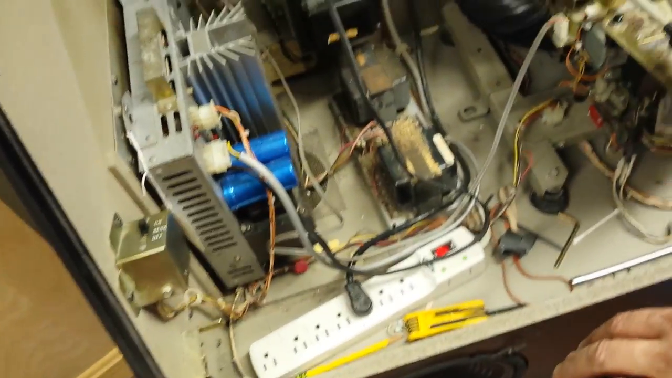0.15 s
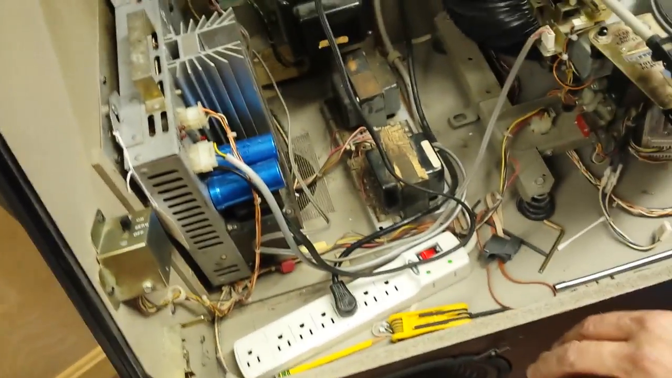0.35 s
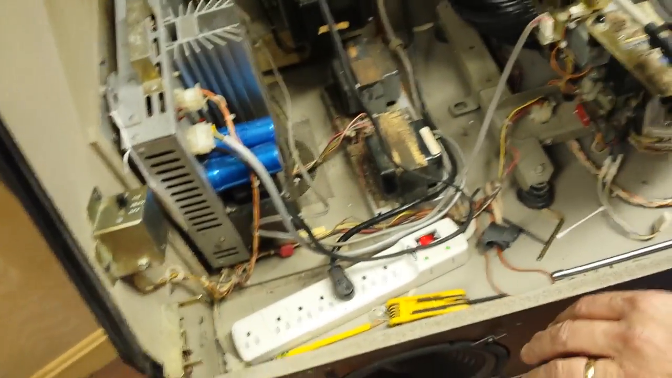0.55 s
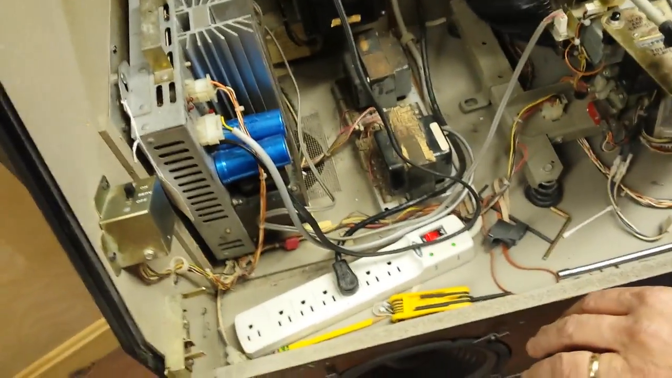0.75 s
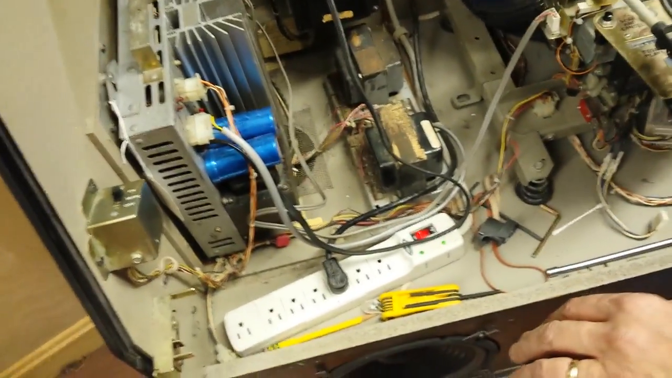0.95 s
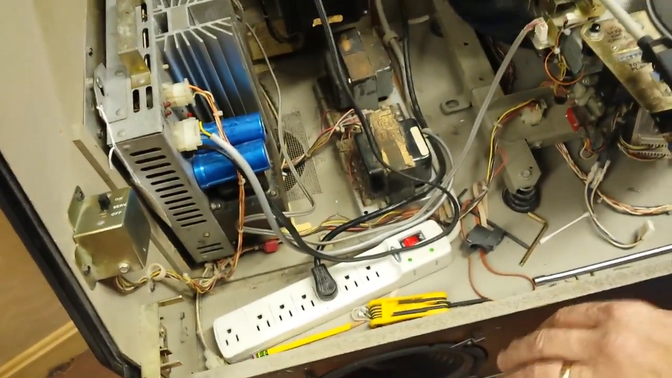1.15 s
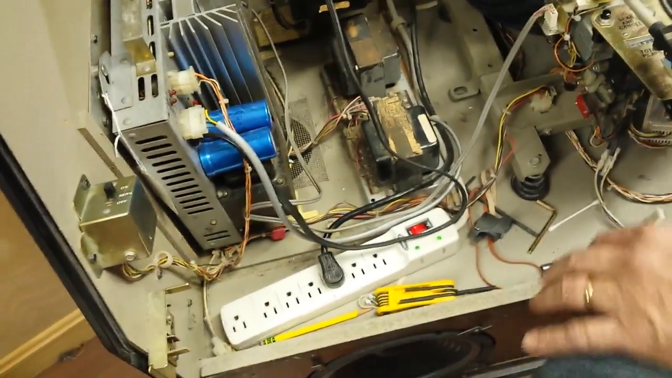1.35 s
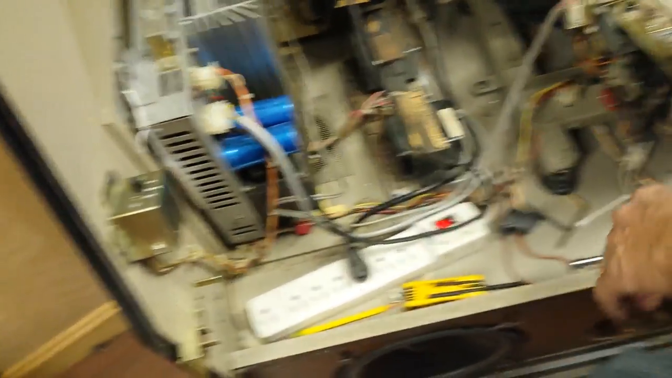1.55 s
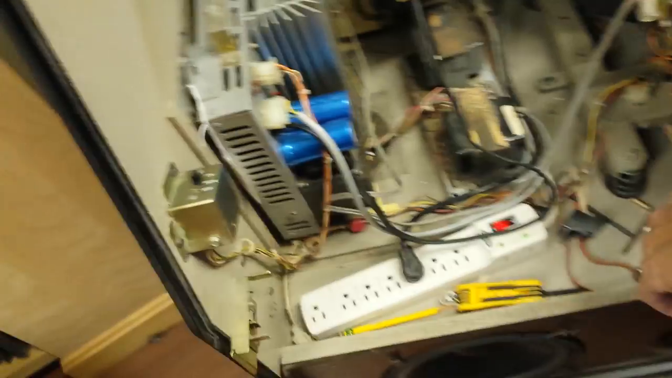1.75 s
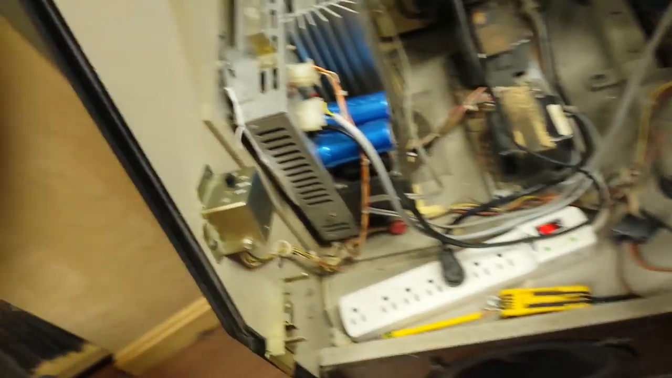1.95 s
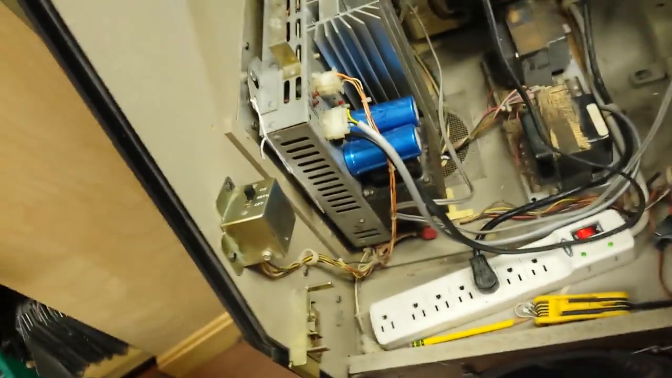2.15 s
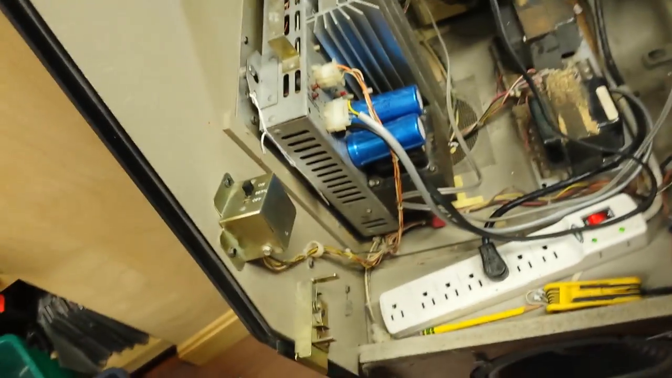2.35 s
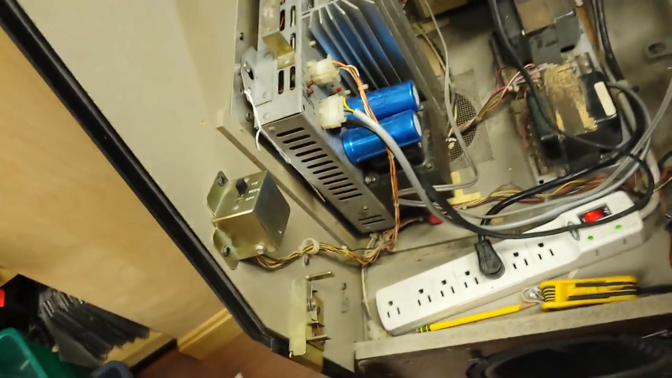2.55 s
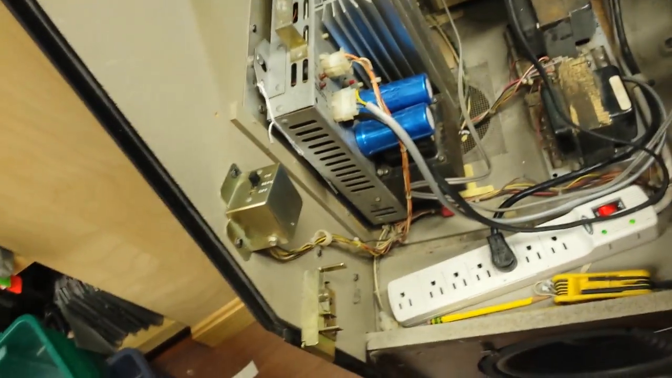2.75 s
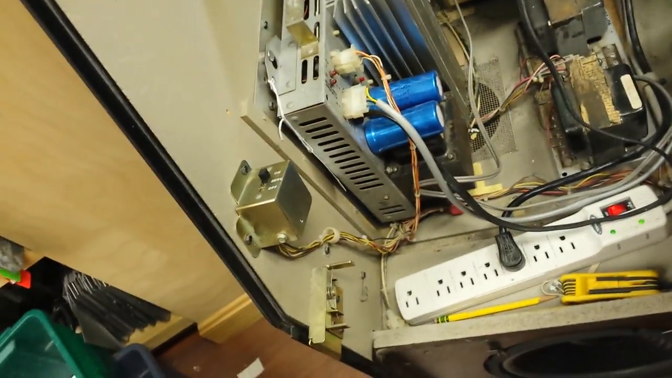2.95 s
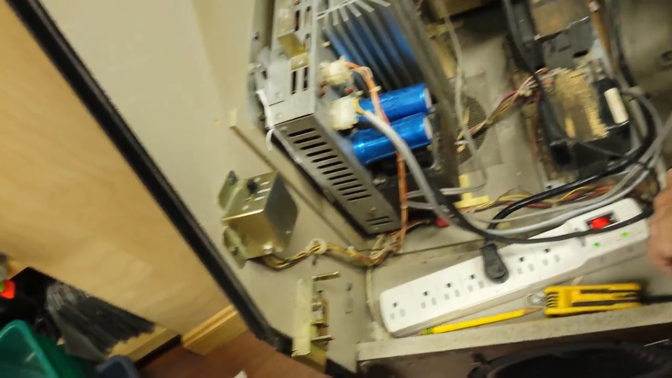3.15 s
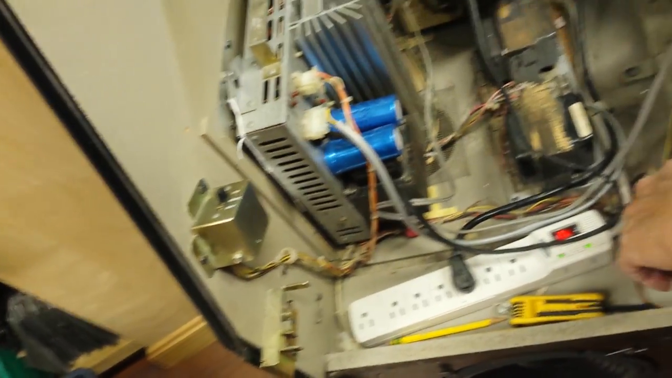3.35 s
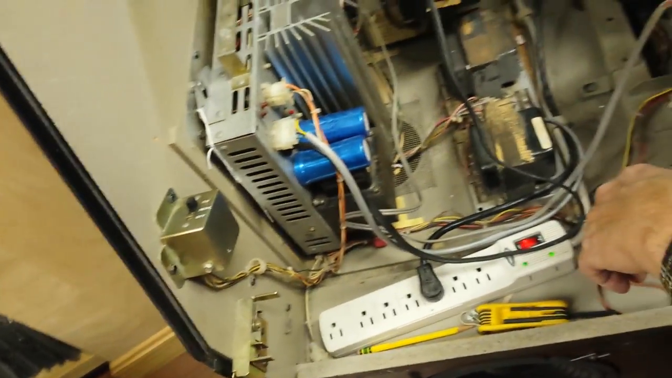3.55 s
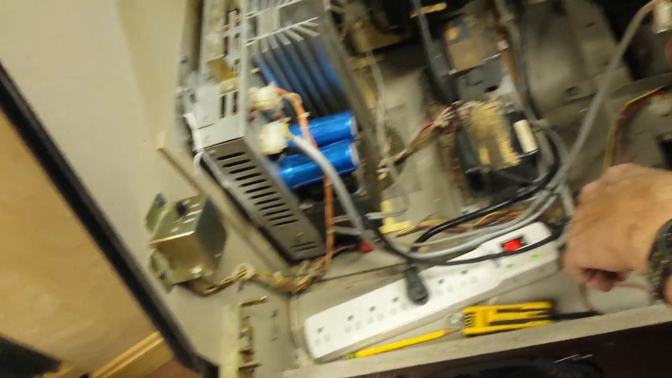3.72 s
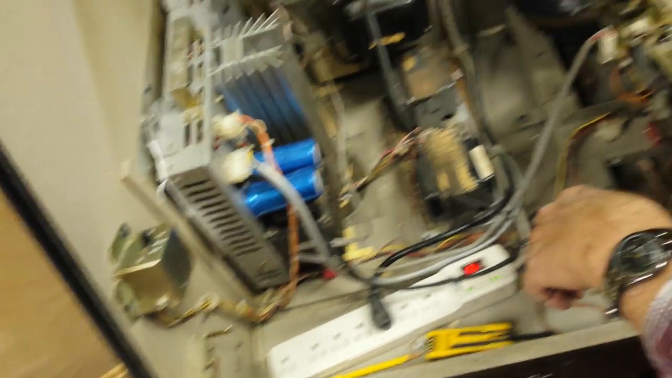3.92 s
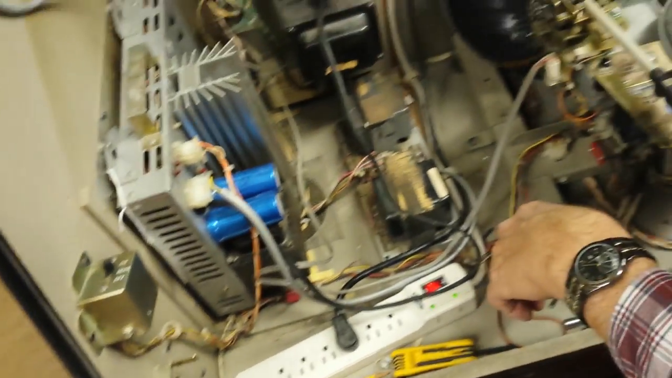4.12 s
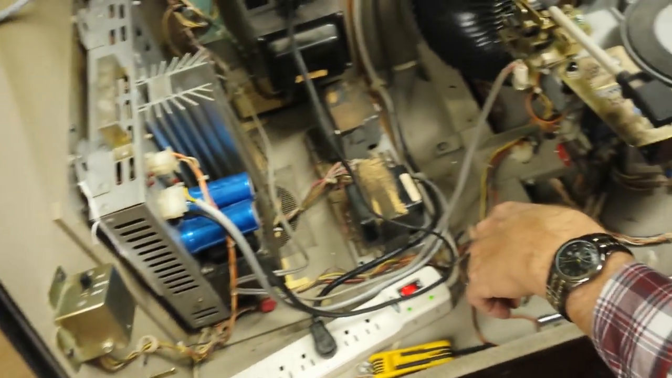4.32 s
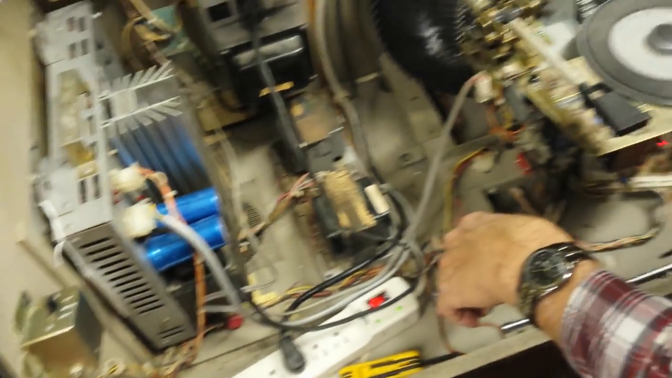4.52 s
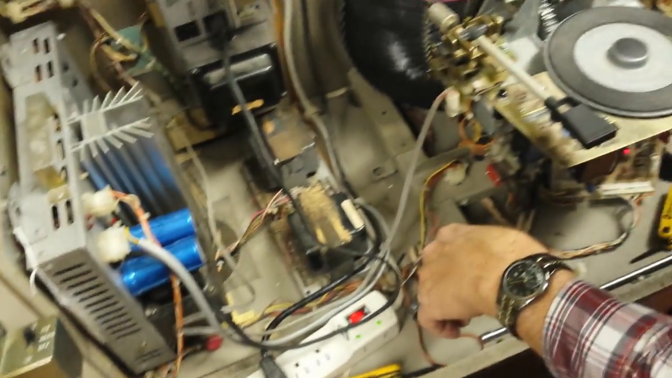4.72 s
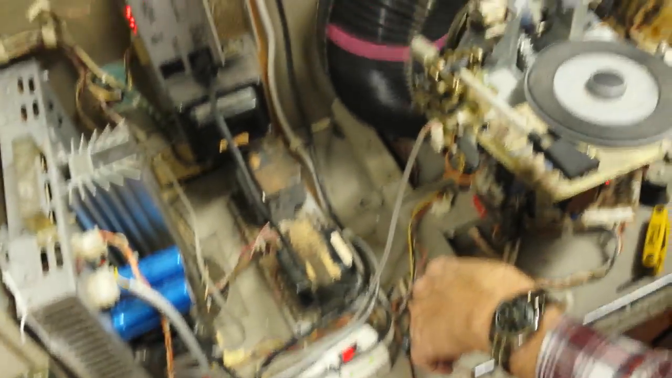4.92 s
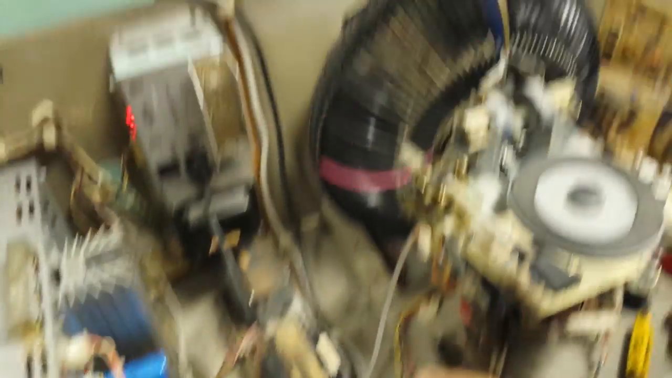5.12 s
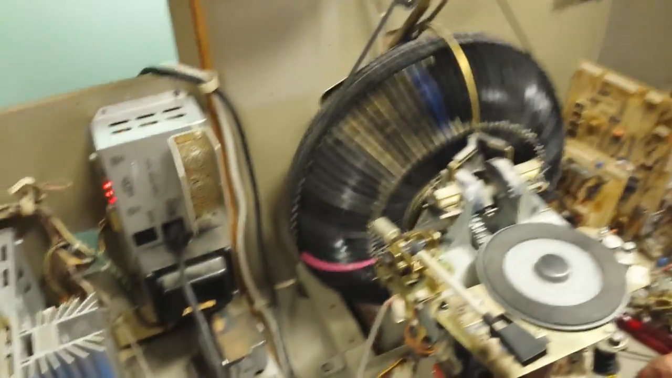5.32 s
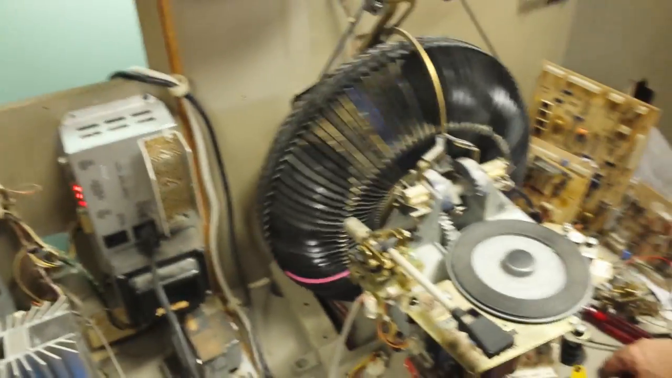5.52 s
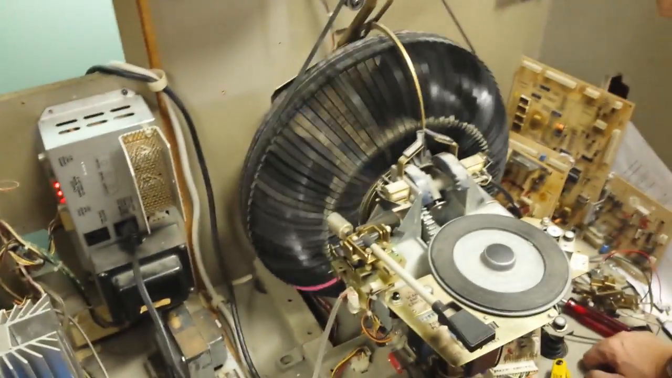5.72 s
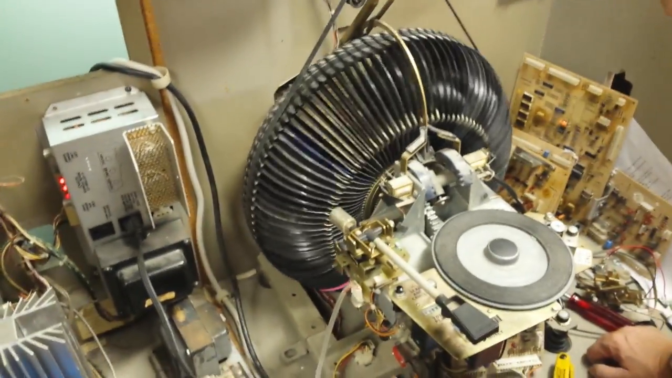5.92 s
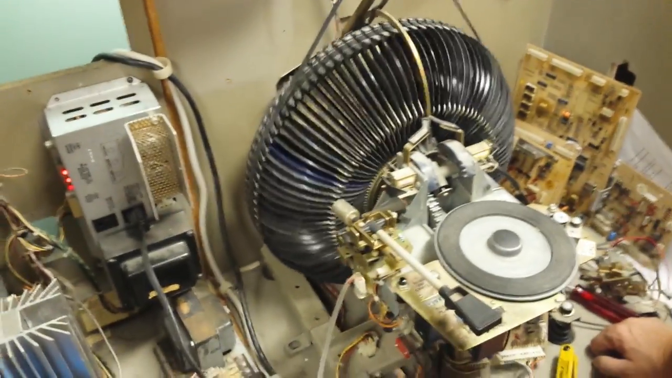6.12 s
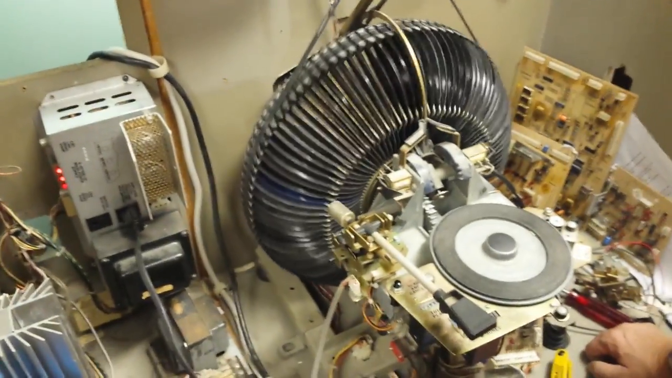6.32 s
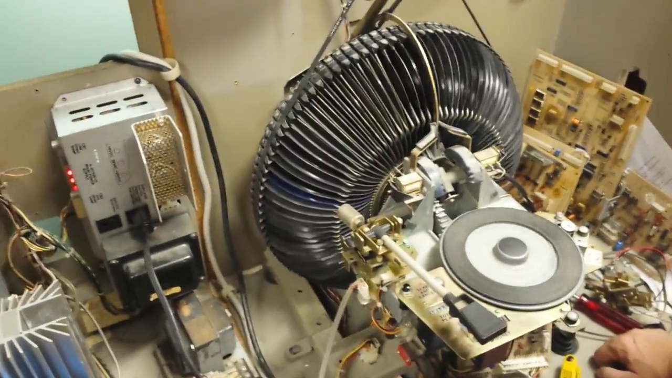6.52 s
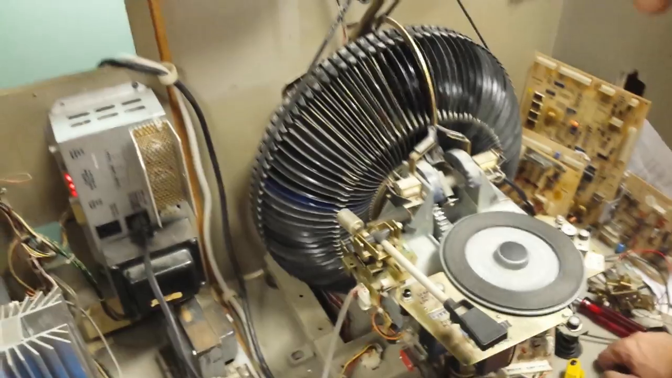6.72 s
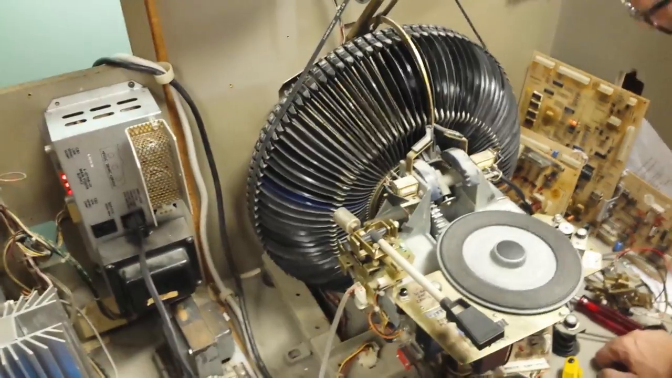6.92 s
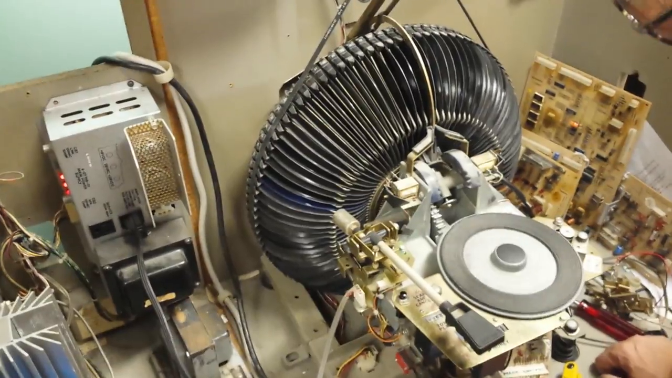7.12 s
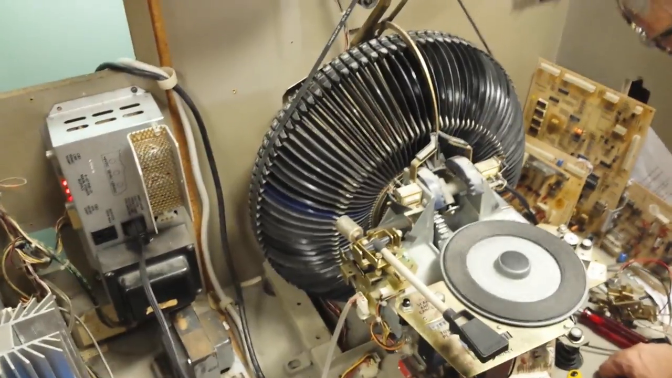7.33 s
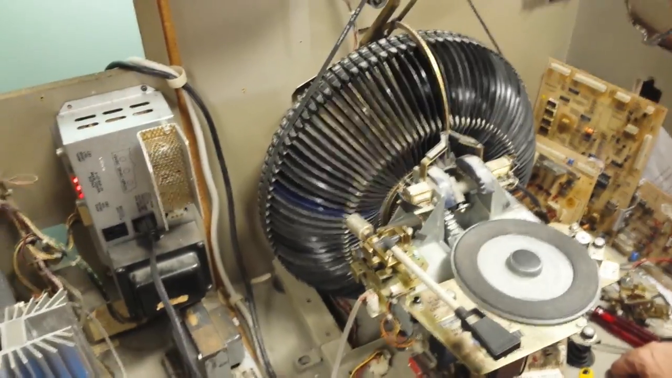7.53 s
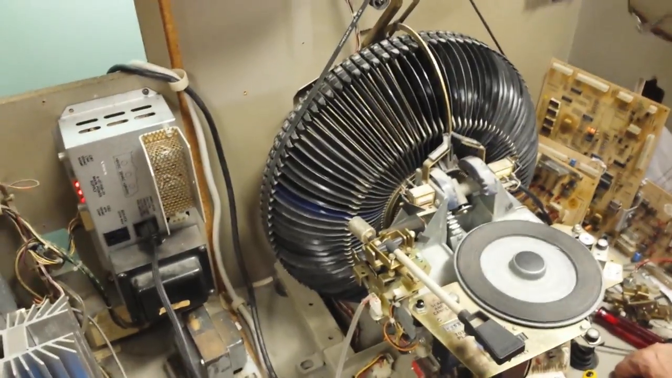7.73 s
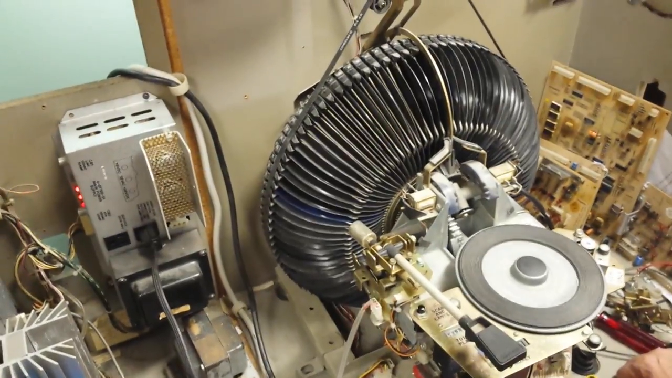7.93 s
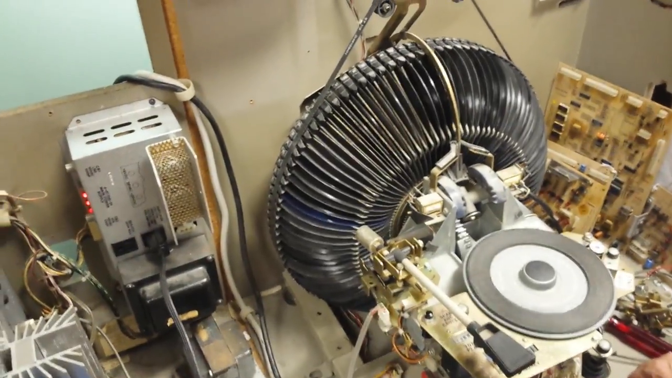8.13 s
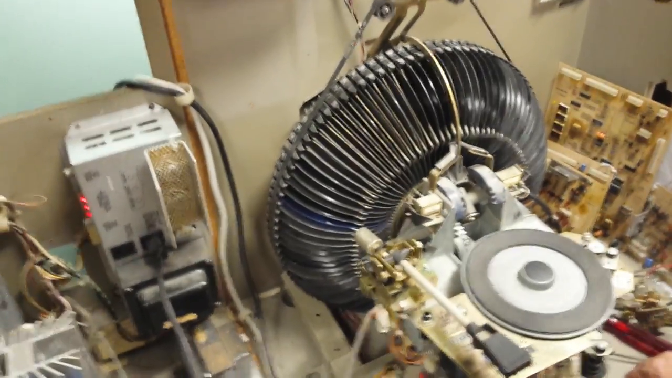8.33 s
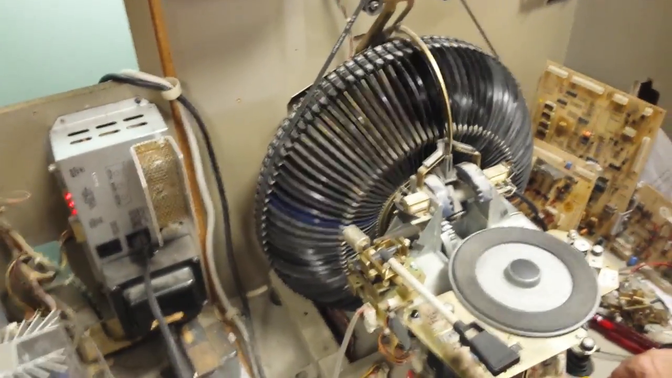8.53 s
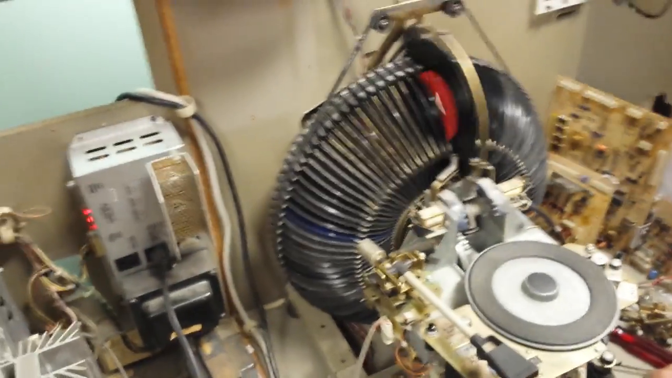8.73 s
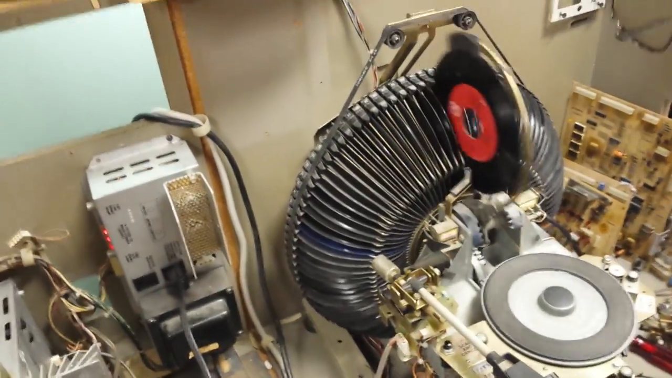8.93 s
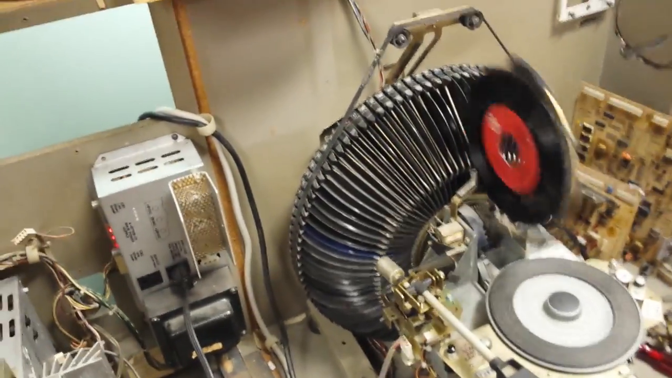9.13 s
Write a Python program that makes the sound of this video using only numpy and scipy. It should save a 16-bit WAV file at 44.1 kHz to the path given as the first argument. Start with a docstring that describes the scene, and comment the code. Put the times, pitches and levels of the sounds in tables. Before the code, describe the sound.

Close up in a quiet room, an open record-changing machine clicks on, whirs and rattles steadily, halts with sharp clacks, then a softer gear train lifts a record.

```python
"""A click, a whirring rattle that runs for six seconds and clatters to a halt: an open jukebox, heard close by.
A relay clicks, a latch pulls in and a geared motor turns the record magazine: random tooth contacts ring its
steel and frame. The latch drops and the records jostle; a quieter gear train then swings the arm that grips
a record and lifts it out, with clicks, taps and scrapes made of short bursts and damped modes.
Dull bumps ring the cabinet panels, a transformer hums underneath, and filtered noise makes the quiet room."""
import sys
import numpy as np
from scipy import signal
from scipy.fft import rfft, irfft, next_fast_len
from scipy.io import wavfile

SR = 44100
rng = np.random.default_rng(int(sys.argv[2]) if len(sys.argv) > 2 else 0)


def store_pcm(level_fs):
    """Save levels as 16-bit WAV."""
    pcm = np.round(np.clip(level_fs, -1, 1) * 32767).astype(np.int16)
    wavfile.write(sys.argv[1], SR, np.atleast_2d(pcm).T)


N = 408807
TIME = np.arange(N) / SR
HZ = np.maximum(np.fft.rfftfreq(8192, 1 / SR), 1)   # filter grid, kept above 0 for the logarithm

# In all tables below, a fall is the time to drop 60 dB, and a half-width is taken where the gain has halved.

# Magazine gears and the frame under them. Each row: frequency in Hz, relative density in dB per Hz.
GEAR_SPECTRUM = [(800, -19.5), (1000, -14), (1350, -9.5), (1800, -8.5), (2200, -2), (2550, -13.5),
                 (3100, -12.5), (3750, -6.5), (4150, 1), (5200, -5.5), (6700, -4), (7700, -0.5),
                 (8800, -12), (10200, -20), (15000, -27)]
FRAME_SPECTRUM = [(40, -28), (85, -18), (130, 6), (185, -7), (220, 2), (400, -3.5), (500, 3.5), (700, -7.5),
                  (970, -2), (1300, -21), (2200, -20.5)]
# Their resonances and notches. Each row: frequency in Hz, width in Hz, rise in dB.
GEAR_MODES = [(700, 200, 3), (960, 40, 7), (1298, 25, 5), (1348, 22, 9), (1463, 20, 8), (1514, 24, 5),
              (2490, 70, -4), (3610, 70, 5), (4060, 100, 1.5), (5730, 50, 4), (5980, 70, 5), (6250, 90, 4)]
FRAME_MODES = [(283.2, 29, 14.3), (408, 49, 10), (485, 17, 5.1), (885, 18, 5.2), (994, 57, 7.1)]
# Loose parts that ring along with the gears. Each row: frequency in Hz, half-width in Hz,
# level in dB against the clatter, dB more per unit of aim, flutter depth in dB.
LOOSE_RINGS = [(1514, 20, -25.5, -3, 1), (2308, 38, -19, 7.5, 2), (2240, 90, -21, 5, 1),
               (4380, 100, -15.5, 1.5, 3), (5990, 90, -18.5, 6, 3), (6270, 120, -18, 5.5, 3),
               (7175, 65, -7.5, -4, 2.5), (7520, 170, -18, 4, 4)]
RING_WANDER_DB, RING_BEND, RING_BEND_PER_S = 0.8, 0.005, 1.5   # level drift, pitch drift as a share, its rate
RING_BUILD_S = 0.25   # time constant for loose parts to shake free
MOTOR_HZ = 56.3   # mean turns per second
# The motor spins up (time constant), runs evenly, and coasts down once the latch has dropped.
START_S, SPIN_UP_S, STOP_S, COAST_DB_PER_S = 0.31, 0.041, 6.48, 68
CLATTER_DB, FRAME_DB = -27.5, -48.5   # at aim 0, before the cabinet
BURRS_PER_S, BURR_DB, BURR_SPREAD_DB = 70, -8.5, 2.5   # level against the ordinary tooth contacts
# The magazine sways on its bearing and loads the gears unevenly. Each row: swings per second, depth in dB.
SWAY = [(7.3, 0.3), (11.0, 0.7), (17.5, 0.5)]
SWAY_WIDTH_HZ = 0.7   # how far the swing rate strays
# Bands of the whirring rattle swell and fade as the magazine turns.
# Each row: height of the swell in seconds, swell time in seconds, level in dB, frequency in Hz, half-width in Hz.
BAND_SWELLS = [(0.326, 0.015, -35.5, 7500, 299), (0.327, 0.011, -42.5, 2280, 120),
               (1.2, 0.46, -36.5, 5070, 350), (1.88, 0.057, -37, 6070, 170), (2.15, 0.67, -33.5, 6190, 260),
               (2.3, .25, -33.5, 7400, 350), (4.75, 0.5, -37.5, 7130, 200), (4.999, 0.52, -38, 4400, 220),
               (5.8, 0.74, -41, 8100, 399)]
SWELL_UNEVEN_DB = 2.5
# Where the microphone points. Each row: time in seconds, aim from -1 at the magazine to +1 at the far side wall.
AIM = [(0.3, 0.17), (1.5, 0.12), (2.0, 0.75), (3.0, 0.7), (3.7, 0.67), (4.3, 0.26), (5.4, -0.7),
       (6.4, -0.3)]
AIM_LOSS_DB, AIM_FRAME_DB = 0.8, 1.3   # per unit of aim: the clatter weakens, the frame grows
# Left minus right: per unit of aim, of the magazine at aim 0, and of the transfer gears.
AIM_PAN_DB, MAGAZINE_PAN_DB, TRANSFER_PAN_DB = 1, 0.73, 1.3
# Cabinet walls. Each row: delay in seconds, seconds more per unit of aim, level in dB.
WALLS = [(0.0031, 0.0005, -13), (0.0052, -0.0008, -13), (0.0083, 0.0012, -14)]

# Transfer gears, their grinding under load, and the arm's gear that whirs while it carries the record.
# Each row: frequency in Hz, relative density in dB per Hz.
CAM_SPECTRUM = [(2500, -20), (3700, -2), (4400, 2.5), (5050, 6.5), (5850, -2), (6800, 0.5), (7650, 9.5),
                (8300, -0.5), (9300, -8.5), (12000, -21.5), (13200, -18), (15000, -38)]
GRIND_SPECTRUM = [(150, -17), (290, -4), (390, -6.5), (560, -15), (800, -11.5), (1000, 0.5), (1200, -11),
                  (1450, -10), (1680, 3.5), (1850, -5.5), (2100, 3.5), (2800, 0.5), (3700, 4),
                  (6000, -21.5)]
ARM_SPECTRUM = [(150, -8), (390, -6.5), (600, -7), (1100, -8.5), (2000, -12), (3100, -6.5), (4200, 6),
                (5200, 0.5), (6400, -3.5), (7400, 3.5), (8500, -13), (10300, -20), (15000, -30)]
# Resonances of the transfer gears and of the arm. Each row: frequency in Hz, width in Hz, rise in dB.
CAM_MODES = [(4390, 140, 6.5), (5380, 200, 5.5), (6480, 290, 5)]
ARM_MODES = [(406, 36, 11), (1150, 38, 11), (1620, 60, 7), (6710, 230, 13), (7240, 140, 11)]
# Transfer parts that sing under load. Each row: frequency in Hz, half-width in Hz, balance in dB before the load term.
CAM_RINGS = [(4950, 45, -3), (5090, 38, -2), (7370, 160, -15)]
CAM_RING_LOAD_DB, CAM_RING_BEND = 7, 0.008   # dB per unit of load, pitch drift as a share
# Steady tones of the transfer motor. Each row: mean frequency in Hz, mean level in dB.
TRANSFER_TONES = [(242.2, -67), (261, -72), (387.6, -67.5), (727, -74), (781, -78), (850.6, -69.5),
                  (1007, -70), (1394, -74), (1610, -68), (1658, -65), (1766, -70)]
# The transfer motor starts as the magazine halts; its load rises as the cam engages and again as the arm lifts.
# Each row: time in seconds, load from 0 to 1.
LOAD = [(6.8, 0.0), (7.4, 0.17), (7.52, 0.93), (7.9, 0.64), (8.1, 0.58), (8.52, 0.7), (8.7, 1), (9.27, 0.2)]
TRANSFER_START_S, TRANSFER_SPIN_UP_S = 6.5, 0.15
CAM_DB, CAM_LOAD_DB, GRIND_DB, GRIND_LOAD_DB = -41.5, 6, -53, 8.5   # idling, and the rise at full load
# The arm's gear joins in, and the cam gears quieten as the arm takes over.
ARM_START_S, ARM_RISE_S, ARM_DB, CAM_RELIEF_DB = 8.66, 0.036, -39, -2.5

# Relay, latch and linkage clicks.
# Each row: start in seconds, level in dB, chatter in seconds, brightness as a low-pass edge in Hz.
CLICKS = [(0.042, -32.5, 0.0013, 8000), (0.0723, -16, 0.0023, 8150), (0.184, -25.5, 0.0012, 8900),
          (0.208, -21, 0.00067, 7360), (0.2378, -16.5, 0.0036, 14000), (0.2433, -16, 0.008, 15040),
          (0.262, -28, .005, 9000), (0.347, -22.5, 0.0067, 10000), (0.359, -16, 0.0019, 9400),
          (6.418, -16, 0.0032, 13000), (6.425, -16, 0.005, 15000), (6.474, -16, 0.0062, 9000),
          (6.498, -26.5, 0.026, 12000), (6.567, -24, 0.0046, 9200), (6.577, -20.5, 0.0044, 9600),
          (6.782, -31.5, 0.0022, 16000), (6.82, -30.5, 0.0019, 15400), (8.34, -24, 0.0032, 6000),
          (8.597, -23.5, 0.0028, 6000), (9.083, -32, 0.0007, 13900), (9.202, -32.5, 0.004, 8000)]
CLICK_FALL_S, FALL_PER_CHATTER = 0.0058, 2.7   # the longer parts chatter, the longer they ring
CHATTER_PER_S = 5000
CLICK_THUD_DB, CLICK_THUD_HZ, CLICK_THUD_S = -28, 319, 0.34   # each tabled click also jolts the cabinet
# Slack in the transfer linkage ticks at random: mean gap, mean level and its spread, chatter, brightness.
SLACK_GAP_S, SLACK_DB, SLACK_SPREAD_DB, SLACK_CHATTER_S, SLACK_HZ = 0.22, -48, 8, 0.0022, 9000
# The steel of the latch. Each row: frequency in Hz, relative density in dB per Hz.
LATCH_SPECTRUM = [(150, -19), (500, -34), (1000, -13), (2100, -2), (2900, -0.5), (4000, 2.5), (5200, 5.5),
                  (6200, 3.5), (7500, 9.5), (8700, 5), (10200, -6), (13000, -5), (15000, -2)]
# The latch rings on after each click. Each row: frequency in Hz, width in Hz, rise in dB.
LATCH_MODES = [(5260, 50, 2), (6760, 130, 1.5), (7460, 100, 3.5), (9000, 55, 2), (11600, 90, 7)]
# Steel strikes steel and rings at one note, in the relay, at the pawl and in the linkage.
# Each row: start in seconds, peak in dB, pitch in Hz, fall in seconds.
CATCHES = [(0.0714, -8.5, 4960, 0.005), (0.0717, -19, 8800, 0.013), (0.1835, -23, 7000, .01),
           (0.21, -21, 4970, .014), (0.234, -26, 3450, 0.049), (0.258, -23, 5250, .12),
           (0.363, -25, 7340, .015), (0.5433, -14, 7270, .02), (2.1403, -14, 5970, .02),
           (2.5527, -15, 7510, .02), (4.148, -16, 7210, .025), (4.7731, -16, 7190, .025),
           (5.217, -13, 7190, .025), (5.591, -9, 7250, 0.041), (5.6816, -14, 7160, .025),
           (6.4187, -11, 5190, 0.057), (6.42, -13, 7860, .01), (6.4278, -9, 5400, 0.032),
           (6.475, -9, 7250, 0.022), (7.1407, -22, 7750, .012), (8.78, -25, 5200, 0.029),
           (9.084, -29, 10000, .005)]
# Dry taps, first on the cabinet, then of the arm as it unlocks and closes on a record.
# Each row: start in seconds, level of the note in dB, its pitch in Hz, snap in dB against the note.
TAPS = [(1.05, -21.5, 590, -27), (1.404, -12.5, 990, -25), (6.975, -30.5, 258, -25), (7.81, -40, 377, -20),
        (8.3915, -26.5, 1490, 9), (8.3924, -20.5, 1040, 6), (8.485, -26, 1460, 6),
        (8.6594, -11.5, 2720, -8), (8.6602, -11.5, 1890, -14), (8.7367, -24.5, 570, -3)]
TAP_CYCLES = 4.4   # a note and its body each fall 60 dB in this many cycles
TAP_BODY_DB, TAP_BODY_PITCH, TAP_LOW_HZ = -11.5, 0.37, 130   # body against the note, and the low cut
SNAP_HZ, SNAP_FALL_S = 5960, 0.0037

# Bumps on the cabinet and the arm knocking against the records.
# Each row: start in seconds, level in dB, centre in Hz, fall in seconds.
KNOCKS = [(0.42, -31.5, 543, 0.14), (1.045, -33.5, 401, 0.32), (1.133, -31, 293, 0.19),
          (1.206, -42, 239, 0.29), (1.328, -31, 307, .2), (1.338, -41, 566, 0.064),
          (1.3983, -14, 1170, 0.053), (1.402, -26, 392, 0.29), (1.4157, -14.5, 1310, .045),
          (1.4235, -18, 1062, 0.048), (1.433, -26, 797, .05), (1.441, -36, 147, 0.22),
          (1.444, -30, 682, .08), (1.629, -40.5, 260, 0.34), (6.306, -41, 223, 0.17),
          (6.421, -29, 2120, 0.074), (6.475, -30, 1700, .06), (6.579, -33, 1517, 0.053),
          (8.399, -49, 97.5, 0.21), (8.738, -32, 218, 0.021)]
KNOCK_SPREAD = 1.9   # a knock excites modes up to about this factor either side of its centre
# The cabinet's panels colour every bump. Each row: frequency in Hz, gain in dB.
PANELS = [(100, 0.5), (200, -5), (380, -1.5), (520, 0), (750, 1), (1100, -2), (1400, 2.5), (1800, -5),
          (2400, -6.5)]
# The panels' modes. Each row: frequency in Hz, width in Hz, rise in dB.
PANEL_MODES = [(151, 40, 9), (270, 54, 8), (480, 44, 6), (610, 45, 5), (985, 90, 7), (1340, 130, 6),
               (1730, 110, 6)]
# Records jostle in their slots as the latch drops and the magazine halts.
# Each row: start in seconds, level in dB, starting pitch in Hz, fall in seconds.
JOSTLES = [(6.417, -42, 450, 0.16), (6.454, -28, 1150, 0.19), (6.533, -28, 900, 0.14),
           (6.592, -33, 280, 0.15), (6.639, -41, 360, 0.33)]
# The pitch sinks to rest; the half-width is a share of the mean of starting and resting pitch.
JOSTLE_REST_HZ, JOSTLE_SAG_S, JOSTLE_WIDTH, JOSTLE_ATTACK_S = 284, 0.01, 0.38, 0.003
# Records scrape in their slots at the halt; later the arm scrapes onto one and draws it out.
# Each row: height in seconds, level in dB, rise in dB per second, fall in dB per second, resonance in Hz.
SCRAPES = [(6.485, -33.5, 900, 110, 1780), (6.513, -41.5, 600, 115, 2900), (8.345, -30, 1800, 900, 1600),
           (8.6, -32, 1500, 700, 1330), (8.675, -35, 900, 142, 1800)]
# The scraping record. Each row: frequency in Hz, relative density in dB per Hz.
SCRAPE_SPECTRUM = [(150, -13), (700, -3.5), (1200, 1), (1750, 2), (2400, -7), (4000, -13), (7500, -22),
                   (12000, -32)]
SCRAPE_WIDTH_HZ, SCRAPE_RISE_DB, SLIPS_PER_S, SLIP_SPREAD_DB = 450, 7, 1400, 2

# Transformer: steady hum, and a surge with a thin buzz that dies away after the selection.
HUM_DB, SURGE_DB, BUZZ_DB, SURGE_FALL_DB_PER_S = -66, -44, -48.5, 69
# The quiet room. Each row: frequency in Hz, relative density in dB per Hz.
ROOM_SPECTRUM = [(20, -41), (42, -18), (70, 2.5), (130, 6.5), (280, -9), (600, -13.5), (2000, -6.5),
                 (8000, -12.5), (15000, -26)]
# A deep rumble that swells briefly. Each row: time in seconds, level in dB.
RUMBLE = [(6.7, -56), (7.3, -55), (7.55, -65), (7.8, -48), (8.1, -63), (8.6, -72)]
# The two microphones. Each row: frequency in Hz, then left minus right in dB.
PORTS = [(100, 0.5), (700, 4), (1400, 5), (2200, -4), (3000, -2), (4400, 12), (5300, 10), (6200, 11),
         (7200, -10.5), (8300, -15), (10200, -2), (11500, -7.5), (14500, -8)]
# Stereo width. Each row: frequency in Hz, side gain in dB.
WIDTH = [(40, -12), (75, -7), (150, -14), (330, -12), (700, -6.5), (1300, 2.5), (2400, -2.5), (5000, -2.5),
         (15000, 2.5)]
LOW_CUT_HZ, CUTOFF_HZ = 26, 15400   # of the microphones


def magazine():
    """Gear teeth clatter in time with the motor, flutter with the sway, and shake frame and loose parts."""
    aim = curve(AIM)
    spin_up = 1 - np.exp(-np.maximum(TIME - START_S, 0) / SPIN_UP_S)
    running = spin_up * amp(-COAST_DB_PER_S * np.maximum(TIME - STOP_S, 0))
    sway_db = sum(depth * flutter(hz) for hz, depth in SWAY)
    clatter = running * amp(CLATTER_DB - AIM_LOSS_DB * aim + sway_db)
    frame = running * amp(FRAME_DB + AIM_FRAME_DB * aim)

    # tooth force swells once and twice per motor turn, with a steady 120 Hz ripple
    turn = 2 * np.pi * np.cumsum(MOTOR_HZ * (1 + 0.0042 * drift(0.54))) / SR
    load_db = 1.4 * np.cos(turn) + 0.58 * np.cos(2 * turn) + 1.0 * np.cos(2 * np.pi * 120 * TIME)
    force = amp(load_db + 0.53 * drift(15.3))
    burrs = amp(BURR_DB) * contacts(BURRS_PER_S, BURR_SPREAD_DB)   # now and then a tooth catches harder

    ringing = []
    for hz, width, db, aim_db, flutter_db in LOOSE_RINGS:
        wander_db = RING_WANDER_DB * drift(0.33) + flutter_db * flutter(SWAY[0][0])
        gliding_hz = hz * (1 + RING_BEND * drift(RING_BEND_PER_S))
        ringing.append((amp(db + aim_db * aim + wander_db), gliding_hz, width))
    loose = 1 - np.exp(-np.maximum(TIME - START_S, 0) / RING_BUILD_S)

    def teeth(gain):
        return rms_one(colour(force * (contacts(per_s=5000, spread_db=1.5) + burrs), gain))

    def face():
        # loose parts are struck less often than the teeth, so they ring in short bursts
        rings = sum(level * gliding(force * contacts(per_s=900, spread_db=0.0), hz, width)
                    for level, hz, width in ringing)
        gears = amp(-2.5) * walls(teeth(shape(GEAR_SPECTRUM, GEAR_MODES)), aim)
        body = frame * teeth(shape(FRAME_SPECTRUM, FRAME_MODES))
        return clatter * (gears + np.sqrt(loose) * rings) + body + force * amp(sway_db) * band_swells()

    return np.array([face(), face()])


def band_swells():
    """Bands of the rattle swell and fade as the magazine turns: hissing swells, each around one resonance."""
    strikes = contacts(per_s=2700, spread_db=1.5) * amp(SWELL_UNEVEN_DB * drift(29.0))
    out = np.zeros(N)
    for s, length, db, hz, width in BAND_SWELLS:
        swell = amp(db) * np.exp(-((TIME - s) / length) ** 2)
        out += swell * rms_one(colour(strikes, resonance(hz, width)))
    return out


def walls(x, aim):
    """Reflections off the cabinet walls shift as the microphone turns, so fine resonances drift."""
    bounced = sum(amp(db) * np.interp(TIME - delay - shift * aim, TIME, x) for delay, shift, db in WALLS)
    return (x + bounced) / np.sqrt(1 + sum(amp(db) ** 2 for _, _, db in WALLS))


def transfer():
    """A gear train ticks loosely, grinds under load and carries its motor's tones, then turns the arm."""
    running = ramp(TRANSFER_START_S, TRANSFER_SPIN_UP_S)
    load = curve(LOAD)
    lifting = ramp(ARM_START_S, ARM_RISE_S)
    clatter = amp(CAM_DB + CAM_LOAD_DB * load + CAM_RELIEF_DB * lifting)
    grind = amp(GRIND_DB + GRIND_LOAD_DB * load)
    force = amp(1.95 * drift(38) + 0.64 * flutter(hz=13.82))
    ticks = amp(-6.5) * contacts(per_s=77, spread_db=-25.0)
    singing = clatter * amp(CAM_RING_LOAD_DB * (load - 2) - 4.9 * lifting)
    bend = 1 + CAM_RING_BEND * drift(2.3)
    parts = [(clatter, shape(CAM_SPECTRUM, CAM_MODES)),
             (grind, shape(GRIND_SPECTRUM)),
             (lifting * amp(ARM_DB), shape(ARM_SPECTRUM, ARM_MODES))]

    def face():
        strikes = force * (contacts(per_s=2700, spread_db=1.5) + ticks)
        rings = sum(amp(db) * gliding(force * contacts(per_s=1600, spread_db=0.5), hz * bend, width)
                    for hz, width, db in CAM_RINGS)
        return singing * rings + sum(level * rms_one(colour(strikes, gain)) for level, gain in parts)

    clock = np.cumsum(1 + 0.0026 * drift(1.814)) / SR   # all tones waver in pitch together
    tones = sum(amp(db + 0.72 * drift(2.6)) * np.sqrt(2) * np.sin(2 * np.pi * hz * clock)
                for hz, db in TRANSFER_TONES)
    return running * np.array([face() + tones, face()])


def clicks():
    """Steel parts chatter against each other for a few milliseconds, then ring out."""
    out, t = np.zeros(N), TIME[:SR // 4]
    for s, db, chatter, bright_hz in CLICKS + slack():
        fall = CLICK_FALL_S + FALL_PER_CHATTER * chatter
        touches = rms_one(rng.choice([-1, 1], len(t)) * (rng.random(len(t)) < CHATTER_PER_S / SR))
        burst = touches * np.exp(-np.log(1000) * np.maximum(t - chatter, 0) / fall)
        edge = signal.butter(3, min(bright_hz, 0.45 * SR), fs=SR, output="sos")
        add(out, s, amp(db) * signal.sosfilt(edge, burst))
    return colour(out, rms_one(shape(LATCH_SPECTRUM, LATCH_MODES)))


def slack():
    """Play in the linkage gives faint clicks at uneven intervals after the transfer motor starts."""
    times = TRANSFER_START_S + np.cumsum(SLACK_GAP_S * rng.uniform(0.3, 1.7, size=40))
    levels = SLACK_DB + SLACK_SPREAD_DB * rng.standard_normal(len(times))
    return [(s, db, SLACK_CHATTER_S, SLACK_HZ) for s, db in zip(times, levels) if s < N / SR]


def catches():
    """The relay's armature hits its stop and the pawl snaps at the magazine's teeth: single damped notes."""
    out = np.zeros(N)
    for s, db, hz, fall in CATCHES:
        add(out, s, amp(db) * ping(hz, fall))
    return out


def taps():
    """One hard contact each: a bright snap, a note and a lower body note, all quickly damped."""
    out = np.zeros(N)
    for s, db, hz, snap_db in TAPS:
        body_hz = TAP_BODY_PITCH * hz
        note = ping(hz, TAP_CYCLES / hz)
        body = amp(TAP_BODY_DB) * ping(body_hz, TAP_CYCLES / body_hz)
        snap = amp(snap_db) * ping(SNAP_HZ, SNAP_FALL_S)
        add(out, s, amp(db) * (note + body + snap))
    return signal.sosfilt(signal.butter(1, TAP_LOW_HZ, "high", fs=SR, output="sos"), out + 1e-18)


def knocks(crack_db=-3.0):
    """Each blow rings a cluster of damped panel modes around its centre, with a short crack above."""
    out, t, count = np.zeros(N), TIME[:SR // 4], 48
    jolts = [(s, db + CLICK_THUD_DB, CLICK_THUD_HZ, CLICK_THUD_S) for s, db, _, _ in CLICKS]
    for s, db, centre_hz, fall in KNOCKS + jolts:
        low_hz, high_hz = centre_hz / KNOCK_SPREAD, centre_hz * KNOCK_SPREAD
        hz = np.geomspace(low_hz, high_hz, count) * np.exp(0.038 * rng.standard_normal(count))
        modes = rng.choice([-1, 1], count) @ np.sin(2 * np.pi * np.outer(hz, t))
        dying = np.exp(-np.log(1000) * t / fall)
        crack_band = np.minimum([high_hz, 2 * high_hz], [SR / 4, SR / 3])
        above = signal.butter(2, crack_band, "band", fs=SR, output="sos")
        crack = amp(crack_db) * rms_one(signal.sosfilt(above, rng.standard_normal(len(t)))) * dying ** 2
        # panels radiate little below their lowest mode
        body = signal.sosfilt(signal.butter(2, 0.65 * low_hz, "high", fs=SR, output="sos"), modes * dying)
        body = rms_one(body) * np.sqrt(np.mean(dying ** 2))
        add(out, s, amp(db) * (body + crack))
    return colour(out, shape(PANELS, PANEL_MODES))


def jostles():
    """Each jolt runs along the records as a dense clatter that sinks to a low shudder."""
    out, t = np.zeros(N), TIME[:SR // 2]
    for s, db, start_hz, fall in JOSTLES:
        hz = JOSTLE_REST_HZ + (start_hz - JOSTLE_REST_HZ) * np.exp(-t / JOSTLE_SAG_S)
        width = JOSTLE_WIDTH * np.sqrt(start_hz * JOSTLE_REST_HZ)
        swell = (1 - np.exp(-t / JOSTLE_ATTACK_S)) * np.exp(-np.log(1000) * t / fall)
        add(out, s, amp(db) * swell * gliding(rng.standard_normal(len(t)), hz, width))
    return signal.sosfilt(signal.butter(2, JOSTLE_REST_HZ / 3, "high", fs=SR, output="sos"), out + 1e-18)


def scrape():
    """Uneven slips of the record's edge against the arm and its slot, each stroke with its own resonance."""
    out = np.zeros(N)
    for s, db, rise, fall, hz in SCRAPES:
        drop_db = np.maximum(rise * (s - TIME), fall * (TIME - s)).clip(0, 100)
        tone = shape(SCRAPE_SPECTRUM, [(hz, SCRAPE_WIDTH_HZ, SCRAPE_RISE_DB)])
        out += amp(db - drop_db) * rms_one(colour(contacts(SLIPS_PER_S, SLIP_SPREAD_DB), tone))
    return out


def transformer(buzz_hz=4590, buzz_width_hz=90, rattle_db=-46, rattle_hz=290, rattle_width_hz=130):
    """Mains hum at 120 Hz, with a thin buzz and a low rattle from loose sheets while the surge lasts."""
    surge = amp(-SURGE_FALL_DB_PER_S * TIME)
    swing = np.sqrt(2) * np.sin(2 * np.pi * 120 * TIME)
    shaking = rng.standard_normal(N) * (1 + swing / 2)
    buzz = amp(BUZZ_DB) * rms_one(colour(shaking, resonance(buzz_hz, buzz_width_hz)))
    rattle = amp(rattle_db) * rms_one(colour(shaking, resonance(rattle_hz, rattle_width_hz)))
    return (amp(HUM_DB) + amp(SURGE_DB) * surge) * swing + surge * (buzz + rattle)


def room_tone():
    """Quiet air as shaped noise, with a deep rumble as narrow-band noise."""
    air = amp(-51.0) * rms_one(colour(rng.standard_normal(N), shape(ROOM_SPECTRUM)))
    rumble_level = amp(curve(RUMBLE)) * (TIME >= RUMBLE[0][0])
    return air + rumble_level * rms_one(colour(rng.standard_normal(N), resonance(hz=42.4, width_hz=11)))


def drive(faces, pan_db):
    """A drive deep in the cabinet: one face radiates to the front, the other sideways."""
    front, flank = faces
    heard = space(front, cabinet_db=-8.0, room_db=-10.0, sideways=0.95 * flank)
    return np.array([heard[0] * amp(pan_db / 2), heard[1] * amp(-pan_db / 2)])


def space(x, cabinet_db, room_db, sideways=0):
    """Quick cabinet reflections and a short room tail; sound thrown sideways widens the image."""
    near, far = amp(cabinet_db), amp(room_db)

    def reflected():
        quick = echoes(t60=0.035, low_hz=1200)
        return signal.oaconvolve(x, near * quick + far * echoes(t60=0.14, low_hz=190))[:N]

    # a wave crossing the microphone pair differs by a quarter cycle
    slanted = np.imag(signal.hilbert(x, next_fast_len(N)))[:N]
    mid = x + reflected()
    side = colour(0.29 * slanted + reflected() + sideways, shape(WIDTH))
    return np.array([mid - side, mid + side]) / np.sqrt(1 + near ** 2 + far ** 2)


def echoes(t60, low_hz):
    """A dense decaying train of reflections with unit energy, thin in the bass."""
    t = TIME[:SR // 2]
    train = rng.standard_normal(len(t)) * np.exp(-np.log(1000) * t / t60)
    train = signal.sosfilt(signal.butter(1, low_hz, "high", fs=SR, output="sos"), train)
    return train / np.sqrt(np.sum(train ** 2))


def contacts(per_s, spread_db):
    """Random contacts of uneven force and either sign, scaled to unit power."""
    force = amp(spread_db * np.minimum(rng.exponential(1, N), 4)) * rng.choice([-1, 1], N)
    return rms_one(force * (rng.random(N) < per_s / SR))


def gliding(strikes, hz, width_hz):
    """A resonance whose centre can move, of unit power: shift to 0 Hz, low-pass, shift back."""
    spin = np.exp(2j * np.pi * np.cumsum(hz) / SR)
    r = np.exp(-2 * np.pi * width_hz / SR)
    slow = signal.lfilter([1], [1, -2 * r, r * r], strikes * spin.conj() + 1e-18)
    return rms_one((spin * slow).real)


def ping(hz, fall):
    """One damped mode of unit peak."""
    t = TIME[:SR // 10]
    pulse = np.sin(2 * np.pi * hz * t) * np.exp(-np.log(1000) * t / fall)
    pulse = signal.sosfilt(signal.butter(1, hz / 2, "high", fs=SR, output="sos"), pulse)
    return pulse / np.abs(pulse).max()


def flutter(hz):
    """Uneven swinging near one rate, of spread 1: noise through a narrow resonance at 200 steps per second."""
    steps = 200
    r = np.exp(-np.pi * SWAY_WIDTH_HZ / steps)
    noise = rng.standard_normal(len(TIME[::SR // steps]) + steps)
    swing = signal.lfilter([1], [1, -2 * r * np.cos(2 * np.pi * hz / steps), r * r], noise)[steps:]
    return np.interp(TIME * steps, np.arange(len(swing)), rms_one(swing))


def drift(rate):
    """Smooth random wandering of spread 1, made at every 40th sample."""
    r = np.exp(-80 * np.pi * rate / SR)
    slow = signal.lfilter([1], [1, -2 * r, r * r], rng.standard_normal(N // 40 + 2002))[2000:]
    return np.interp(np.arange(N) / 40, np.arange(len(slow)), rms_one(slow))


def shape(points, modes=()):
    """Gain over frequency: a smooth spectrum with resonances standing on it."""
    hz, db = np.transpose(points)
    peaks = sum(rise / (1 + (2 * (HZ - centre) / width) ** 2) for centre, width, rise in modes)
    return amp(np.interp(np.log(HZ), np.log(hz), db) + peaks)


def resonance(hz, width_hz):
    """Gain over frequency of one mode, halved at width_hz either side."""
    return 1 / (1 + ((HZ - hz) / width_hz) ** 2)


def colour(x, gain):
    """Causal (minimum-phase) filter with the given gain over frequency."""
    cepstrum = irfft(np.log(gain + 1e-6))
    fold = 1 + np.sign(len(cepstrum) / 2 - np.arange(len(cepstrum)))
    fold[0] = 1
    impulse = irfft(np.exp(rfft(cepstrum * fold)))
    return signal.oaconvolve(x, impulse)[:len(x)]


def curve(rows):
    """A control at every sample, in straight lines between rows."""
    return np.interp(TIME, *np.transpose(rows))


def ramp(start, length):
    """Rise from 0 to 1 in a straight line."""
    return np.clip((TIME - start) / length, 0, 1)


def amp(db):
    """Decibels to gain."""
    return 10 ** (np.asarray(db) / 20)


def rms_one(x):
    """Scale to unit power."""
    return x / np.sqrt(np.mean(x ** 2) + 1e-20)


def add(track, s, sound):
    """Mix a short sound in at time s."""
    start = int(s * SR)
    track[start:start + len(sound)] += sound[:N - start]


def scene():
    """Drives deep in the cabinet, clicks and knocks nearer, over mains hum and quiet room tone."""
    drives = drive(magazine(), MAGAZINE_PAN_DB + AIM_PAN_DB * curve(AIM))
    drives = drives + drive(transfer(), TRANSFER_PAN_DB)
    steel = space(clicks(), cabinet_db=-1.5, room_db=-1.5, sideways=amp(1.5) * clicks())
    bumps = space(knocks() + jostles() + scrape(), cabinet_db=-2.0, room_db=-6.0)
    floor = space(room_tone() + transformer(), cabinet_db=2.0, room_db=0.0, sideways=room_tone())
    return drives + steel + bumps + catches() + taps() + floor   # catches and taps stay dry and central


def record(dry):
    """The left port favours the lower treble, the right the upper; peaks are rounded, deep bass and top cut."""
    tilt = shape(PORTS)
    right = np.sqrt(2 / (1 + tilt ** 2))   # keeps the summed power of the two ports even
    heard = np.tanh([colour(dry[0], right * tilt), colour(dry[1], right)])
    heard = signal.sosfilt(signal.butter(2, LOW_CUT_HZ, "high", fs=SR, output="sos"), heard)
    return signal.sosfilt(signal.ellip(10, 0.2, 80, CUTOFF_HZ, fs=SR, output="sos"), heard)


dry = scene()
out = record(dry)
store_pcm(out)
```